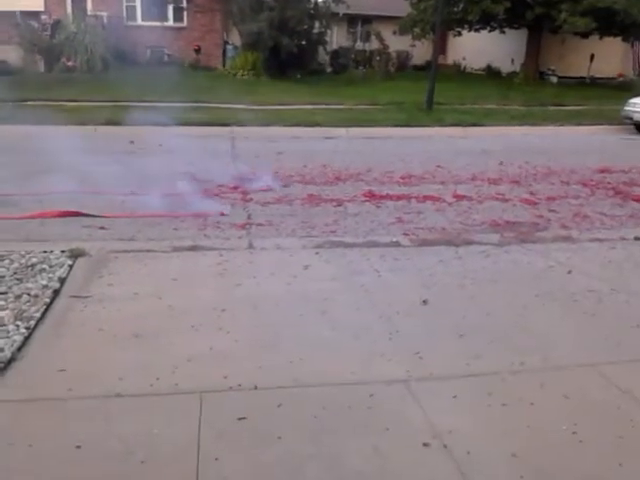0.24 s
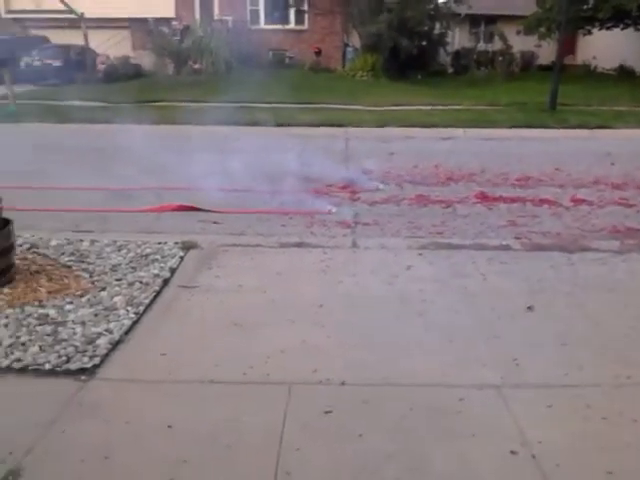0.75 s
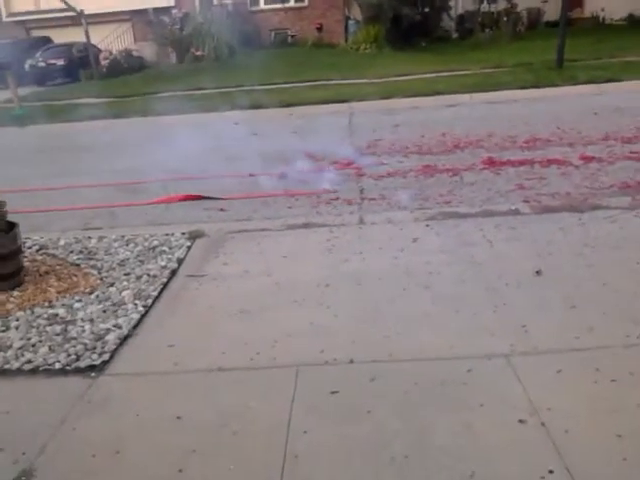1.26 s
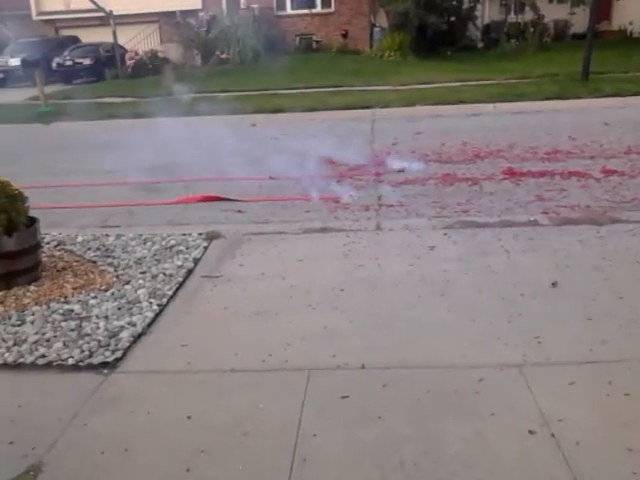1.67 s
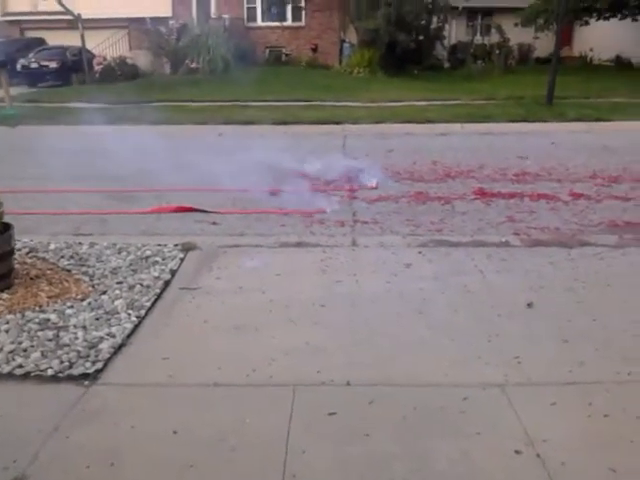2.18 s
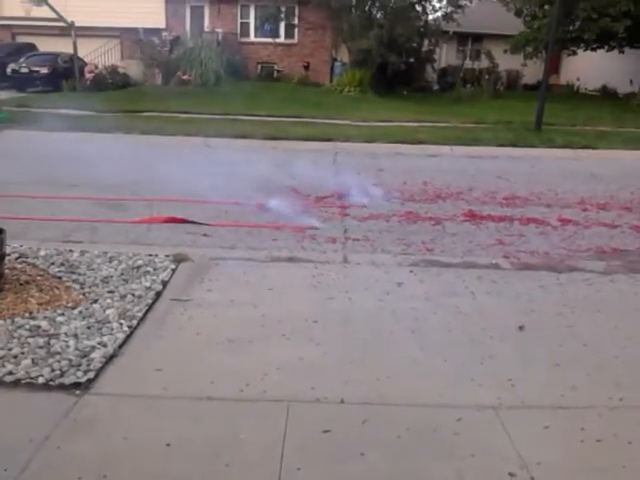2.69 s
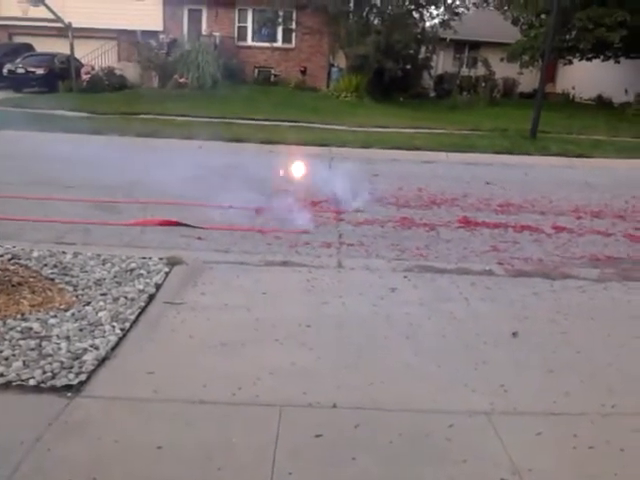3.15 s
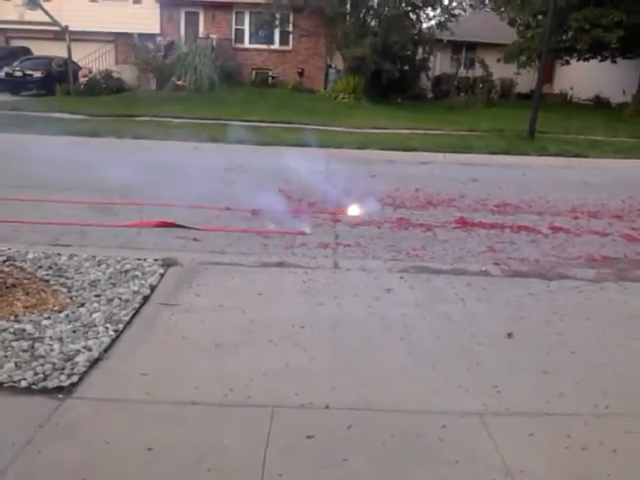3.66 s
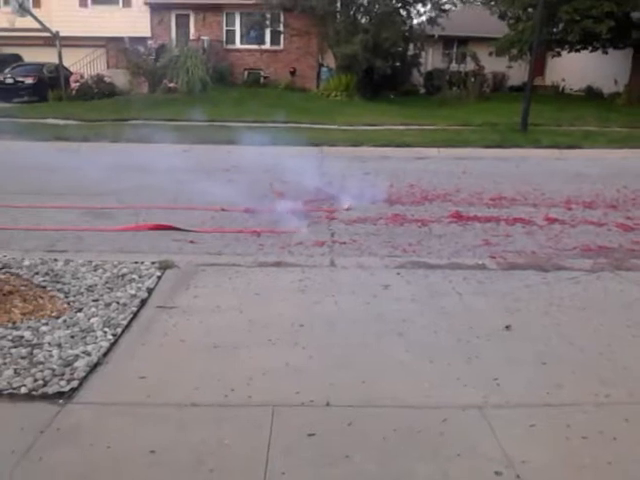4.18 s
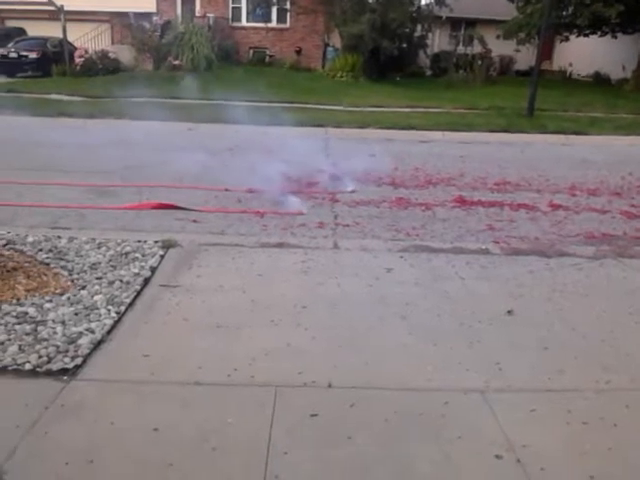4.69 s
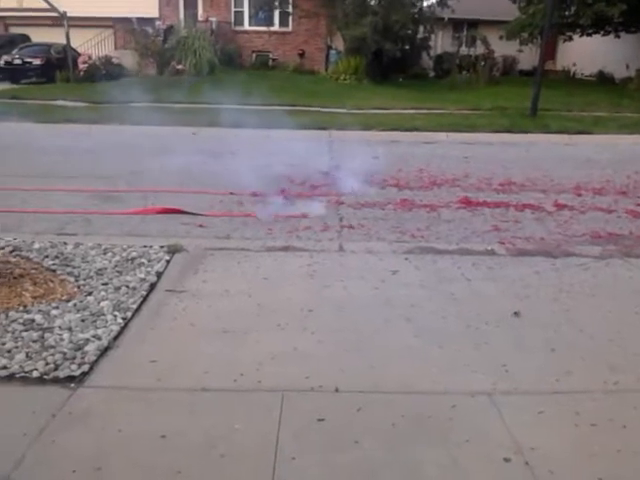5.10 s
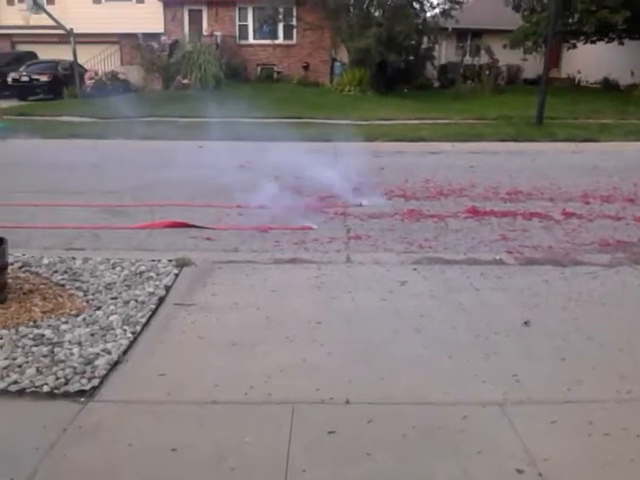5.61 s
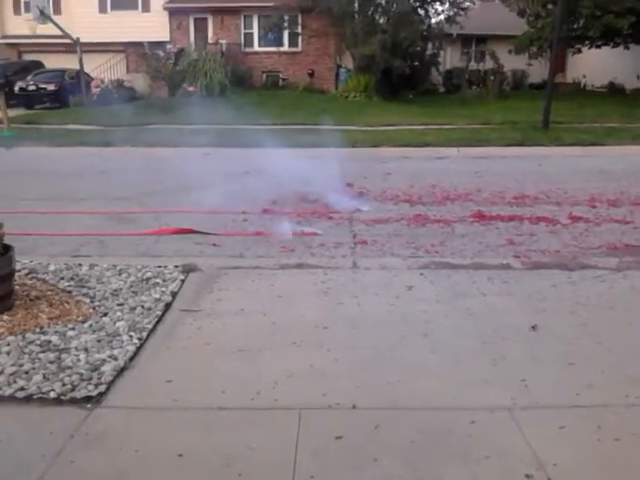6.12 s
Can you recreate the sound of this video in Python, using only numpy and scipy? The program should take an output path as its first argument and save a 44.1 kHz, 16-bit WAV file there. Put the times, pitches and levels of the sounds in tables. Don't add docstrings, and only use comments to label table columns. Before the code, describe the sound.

A dense, ragged barrage of firecrackers crackles without pause outdoors, near bangs harsh and distorted, farther volleys duller, with occasional low thumps.

```python
import sys
import numpy as np
from scipy import signal
from scipy.io import wavfile
from scipy.ndimage import uniform_filter1d, minimum_filter1d

SR = 44100
rng = np.random.default_rng(int(sys.argv[2]) if len(sys.argv) > 2 else 0)


def decibels_to_gain(level_db):
    exponent = np.asarray(level_db, float) / 20
    return 10 ** exponent


def digitize_waveform(pressure):
    field = np.atleast_2d(pressure).T
    bounded = np.clip(field, -1, 1)
    quanta = np.round(bounded * 32767).astype(np.int16)
    wavfile.write(sys.argv[1], SR, quanta)


N = 279946

# t/s, level/dB, thump relative to crack/dB
LONE_POPS = [(0.002, -17, -16.2), (0.19, -11, -4), (0.326, -7, -17), (0.69, -10.0, -8.5), (1.024, -6, -6),
             (1.84, -6.5, -32), (2.042, -9, -17), (2.136, -11.5, -22), (2.45, -13.5, -10),
             (2.468, -12, -21), (2.518, -8, -6), (2.573, -12, -9), (2.672, -19.0, -12), (2.696, -21.5, 0.5),
             (2.838, -19.0, -7), (2.985, -8, -29), (3.061, -13, -30), (3.127, -10.5, -20.5),
             (3.55, -14, -11.1), (3.62, -9.5, -27.5), (4.508, -15.5, -29), (4.572, -13.5, -7.5),
             (4.789, -20, 3), (4.907, -10.5, -21), (4.981, -14, -30), (5.327, -18, -3), (5.388, -11.5, -7),
             (6.046, -10, -11), (6.198, -17.5, -8.5), (6.327, -19, -20.9)]
# t/s, span/s, splatter level/dB
OVERLOADS = [(0.0699, .009, -34), (0.4885, 0, -60), (0.628, .015, -26), (1.0329, 0.0024, -31.5),
             (1.0701, .003, -24.5), (1.8056, 0.0021, -33), (1.836, .02, -24.5), (1.8647, .009, -14),
             (1.8856, 0.0017, -32.5), (2.474, 0.0033, -31.5), (2.523, .009, -20.5), (2.73, 0, -51.5),
             (2.9477, 0, -28), (3.0661, .012, -36.5), (3.1337, 0.0022, -61.5), (3.289, .009, -26),
             (3.315, 0, -58), (3.4361, .007, -21), (3.5854, 0.0018, -30.5), (3.7853, 0, -27.5),
             (3.849, 0.00092, -45.5), (3.881, 0.00034, -35), (3.8934, .009, -35), (3.9873, 0.0025, -45.5),
             (4.2533, 0, -48.5), (4.5783, .002, -30), (5.2176, 0.00088, -24.5), (5.4282, 0, -21.5),
             (5.436, 0.028, -35.5), (5.4537, .019, -18.5)]
# t/s, level/dB, burst length/s, thump relative to crack/dB
VOLLEYS = [(0.239, -4.0, 0.12, -19), (0.457, -2.5, 0.12, -12.5), (0.606, -6.5, 0.12, -10),
           (0.964, -6, 0.11, -7), (1.136, -4.0, 0.13, -8), (1.773, -2, 0.12, -10),
           (1.844, -3, 0.035, -8.5), (1.897, -7.0, 0.12, -23), (2.464, -4.0, 0.07, -13.5),
           (2.705, -5.5, 0.12, -14), (2.902, -2.5, 0.12, -11), (3.268, -5, 0.05, -14),
           (3.383, -6, 0.095, -8.2), (3.478, -7.5, 0.075, -11.5), (3.547, -1.5, 0.1, -11.4),
           (3.733, -3, 0.11, -11), (3.823, -4, 0.11, -19), (3.875, -4.5, 0.082, -6.5),
           (3.947, -7, 0.12, -9), (4.368, -7.5, 0.074, -9), (4.805, -4.5, 0.11, -9),
           (5.002, -1.5, 0.17, -11), (5.123, -2.5, 0.12, -7.5), (5.193, -5.5, 0.12, -9.5),
           (5.395, -3, 0.11, -15), (5.426, -2, 0.031, -3), (5.516, -7.0, 0.089, -9.5),
           (5.607, -8, 0.12, -8.5), (5.954, -7, 0.19, -6), (6.21, -8, 0.084, -6.5),
           (0.052, -9.5, 0.027, -7.5), (0.125, -9.5, 0.11, -7.5), (0.337, -10.5, 0.12, -19),
                  (0.613, -5.5, 0.018, -5.9), (1.055, -13, 0.038, -1.5), (1.056, -12.5, 0.12, -15.5),
                  (1.219, -8, 0.12, -14), (1.572, -9, 0.12, -10), (1.726, -11.5, 0.07, -5.5),
                  (2.018, -8.5, 0.11, -11), (2.063, -8, 0.022, -21.3), (2.263, -11.5, 0.056, -3.5),
                  (2.272, -8.5, 0.029, -24), (2.327, -11, 0.022, -23), (2.356, -11.5, 0.08, -26),
                  (2.546, -12.5, 0.13, -9.5), (2.847, -9, 0.065, -8.5), (3.043, -7.5, 0.095, -4.5),
                  (3.116, -11, 0.07, -8), (3.2, -15, 0.073, -5.5), (3.33, -8, 0.12, -14),
                  (3.426, -4.5, 0.015, -10.5), (3.657, -7, 0.024, -9), (4.085, -10.5, 0.12, -4),
                  (4.221, -7.5, 0.055, -12.1), (4.559, -9, 0.095, -7.5), (4.674, -14.5, 0.16, -7),
                  (5.055, -6, 0.14, -19), (5.84, -12.5, 0.078, -6.5), (6.047, -13.5, 0.15, -8),
           (0.002, -12.5, 0.095, -6), (0.035, -12, 0.14, -20), (0.567, -15, 0.045, -20),
               (0.702, -14, 0.095, -13.5), (0.719, -14.5, 0.035, -25.0), (0.79, -12.5, 0.05, -9.5),
               (0.856, -25, 0.0097, -19.1), (0.908, -19.5, 0.05, -9.5), (1.317, -14.5, 0.05, -24.1),
               (1.488, -17, 0.042, -5.5), (1.539, -19, 0.025, -5.5), (1.641, -14, 0.05, -25.0),
               (1.661, -19.5, 0.07, -7), (2.117, -13.0, 0.15, -23), (2.615, -13.5, 0.011, -29),
               (2.777, -7.5, 0.011, -9.5), (3.01, -14.5, 0.07, -8.5), (3.685, -17, 0.09, -14),
               (4.041, -15, 0.05, -27.5), (4.18, -17, 0.027, -5), (4.278, -16.0, 0.07, -19),
               (4.445, -12, 0.088, -21), (4.912, -19, 0.028, -20.5), (5.347, -13.5, 0.096, -16.5),
               (5.5, -12, 0.077, -30), (5.626, -11, 0.014, -16), (5.699, -14.5, 0.05, -25),
               (5.751, -15.5, 0.095, -19.4), (5.934, -14.5, 0.018, -33), (6.307, -14, 0.1, -14.5)]
# t/s, level/dB
HEAVY_BOOMS = [(0.241, -27), (0.479, -28), (0.618, -24), (0.816, -35), (1.014, -22), (1.15, -29),
               (1.228, -22), (1.782, -15), (2.036, -26.5), (2.262, -22.5), (2.45, -31), (2.719, -22),
               (2.914, -22.5), (3.097, -24.5), (3.365, -23.5), (3.561, -24.5), (3.735, -20.5),
               (4.089, -28.5), (4.202, -31.5), (4.356, -30), (4.569, -27.5), (4.801, -28), (5.009, -31),
               (5.102, -15.5), (5.381, -27.5), (5.599, -24), (5.833, -29.5), (5.959, -35)]
# t/s, level/dB
OPENING_CRACKS = [(0.864, -16), (0.978, -7.5), (1.065, -4.5), (1.149, -7), (1.47, -13), (1.561, -8.5),
                  (1.735, -8.5), (2.285, -7), (2.728, -7.5), (3.211, -4), (3.273, 1), (3.488, -10),
                  (4.669, -13), (4.808, -3), (5.931, -8.5), (6.12, -13), (6.227, -6.5)]
# t/s, upper resonance f/Hz, brightness level/dB
COLOUR_DRIFT = [(0.0, 2260, 4.5), (0.76, 2095, 1), (0.87, 2340, 6), (1.02, 2200, 2), (2.05, 2265, -3.5),
                (2.08, 2370, -4), (2.16, 1840, -10), (2.28, 2450, 4), (2.63, 1990, -2.5), (2.67, 2180, -1),
                (3.91, 2166, 1.5), (4.01, 2410, 0.5), (4.1, 2010, 2), (4.21, 2220, 0.5), (4.97, 2080, 0),
                (5.04, 2210, 1), (6.06, 2336, 3.5), (6.35, 2050, -2.5)]
# f/Hz, level/dB
NARROW_BAND = [(20, -41), (60, -4.5), (150, -4.5), (1000, -2.5), (2400, -2), (3000, -12), (3500, -20.5),
               (3900, -33), (4300, -40.5), (4600, -56.5), (5000, -110), (6000, -120)]

PULSE_GRID_HZ = 8000
FULL_SCALE = .705
RISE_S, SWELL_SHARE = 0.0037, 0.36
POP_S, CRACK_S, CRACK_THUMP_DB = 0.0067, 0.0077, -11
THUMP_CONTRAST = 1.51
LOWER_HZ = 687
RING_DB_PER_DB = -.5
OVER_GAP_S = .0037
OVER_EDGE_DB, OVER_SCATTER_DB = -5.5, -7
BOOM_RISE_S, BOOM_T60, BOOM_FLOOR_DB, BOOM_LEAD_S = 0.0092, 0.24, -51.5, 0.013


def evened(x):
    return x / np.sqrt(np.mean(x ** 2) + 1e-20)


def levelled(x, size):
    power = uniform_filter1d(uniform_filter1d(x ** 2, size), size)
    return x / np.sqrt(abs(power) + 1e-12)


def held(values, seconds):
    return np.interp(np.arange(N) / SR / seconds, np.arange(len(values)), values)


def resonate(x, hz, width_hz):
    turn = np.exp(2j * np.pi * np.cumsum(hz) / SR)
    r = np.exp(-np.pi * width_hz / SR)
    smooth = signal.lfilter([1 - r], [1, -r], x / turn)
    return 2 * (turn * smooth).real


def boost(x, hz, width_hz, db):
    return x + decibels_to_gain(db) * resonate(x, hz, width_hz)


def causal(points):
    f, db = np.transpose(points)
    hz = abs(np.fft.fftfreq(8192, 1 / SR))
    log_gain = np.log(decibels_to_gain(np.interp(np.log(hz + 1), np.log(f + 1), db)))
    min_phase = signal.hilbert(log_gain).imag
    return np.fft.ifft(np.exp(log_gain - 1j * min_phase)).real[:3000]


def pulses(share=.14, spread_db=3.5, dust_db=-10, repeat=0.51):
    count = N * PULSE_GRID_HZ // SR
    k = np.arange(count)
    frame = k // 160
    hit, sign, size, lag = rng.random((count, 4)).T
    crowd = 2.2 * uniform_filter1d(sign[frame * 7], size=80) ** 1.5 + .25
    big = (hit < share * crowd) * np.sign(sign - .5) * decibels_to_gain(-spread_db * np.log(1 - size))
    train = evened(big) + decibels_to_gain(dust_db) * crowd * rng.standard_normal(count)
    back = (18 + 100 * lag[frame] ** 2).astype(int)
    train = train + repeat * train[np.maximum(k - back, 0)]
    out = np.zeros(N)
    out[k * SR // PULSE_GRID_HZ] = train
    return levelled(out, size=260)


def loudness(fall_t60=0.068, sag_t60=0.46, floor_db=-33):
    power = np.ones((2, N + SR)) * decibels_to_gain(2 * (floor_db + np.array([[0], [-12]])))
    t = np.arange(SR // 6) / SR
    volleys = VOLLEYS
    pops = [(s, db, POP_S, low) for s, db, low in LONE_POPS]
    cracks = [(s - RISE_S, db, CRACK_S, CRACK_THUMP_DB) for s, db in OPENING_CRACKS]
    for start, db, length, thump_db in volleys + pops + cracks:
        rise = (1 - np.exp(-t / (RISE_S + SWELL_SHARE * length))) ** 2
        fall_db = 60 * (np.maximum(t - length, 0) / fall_t60 + t / sag_t60)
        at = round(abs(start) * SR)
        power[:, at:at + len(t)] += rise * decibels_to_gain(2 * (db - fall_db + np.array([[0], [thump_db]])))
    return np.sqrt(power[:, :N])


def bangs(taps, jitter_db=-0.7, crack_db=5, ring_db=6.5, mid_db=-2, top_db=-1, thump_db=17, boom_db=3):
    wander = [held(w, .02) for w in rng.standard_normal((N // 400, 7)).T]
    train = pulses() * decibels_to_gain(jitter_db * held(rng.standard_normal(N // 200), .005))
    s, *columns = np.transpose(COLOUR_DRIFT)
    upper_hz, shine_db = (np.interp(np.arange(N) / SR, s, c) for c in columns)
    crack, thump = loudness()
    thump = thump * (thump / np.percentile(thump, 80)) ** (THUMP_CONTRAST - 1)
    boom = decibels_to_gain(boom_db) * booms() * thump / uniform_filter1d(thump, size=4000)
    swing = .095
    bright_db = 20 * np.log10(crack / crack.mean())

    high_pass = signal.butter(1, 800, "high", fs=SR)
    out = signal.lfilter(*high_pass, train * crack) * decibels_to_gain(crack_db)
    lower_hz = LOWER_HZ * np.exp(0.25 * wander[6])
    out = out + resonate(train * thump, lower_hz, 250) * decibels_to_gain(thump_db)
    upper_db = ring_db + RING_DB_PER_DB * bright_db + 2.9 * wander[1]
    out = boost(out, upper_hz * (1 + swing * wander[0]), 330, upper_db)
    out = boost(out, 1350 * (1 + 2 * swing * wander[2]), 170, mid_db + 1.2 * wander[3])
    shine_db = top_db + shine_db + 4.3 * wander[5] + 0.1 * bright_db
    out = boost(out, 3150 * (1 + swing / 2 * wander[4]), 410, shine_db)
    out = boost(out, np.full(N, 3900.), 520, 3 * wander[4] + 1.1 * bright_db)

    boom_hz = np.full(N, 95.)
    low_ring = resonate(resonate(train, boom_hz, 210), boom_hz, 210)
    out -= boom * levelled(low_ring, size=1200)
    return signal.oaconvolve(out, taps)[:N]


def flurries():
    chance = rng.random((len(OVERLOADS), 2, 9))
    out = []
    for (start, span, db), (shift, size) in zip(OVERLOADS, chance):
        count = 1 + int(np.ceil(span / OVER_GAP_S))
        place = np.linspace(-1, 1, count) * (count > 2)
        uneven_s = (count > 2) * (shift[:count] - .5) * OVER_GAP_S / 2
        s = start + np.linspace(0, span, count) + uneven_s
        scatter_db = (count > 1) * OVER_SCATTER_DB * size[:count]
        out += zip(s, db + OVER_EDGE_DB * place ** 2 + scatter_db)
    return np.transpose(out)


def overs(taps, reach_db=9):
    shape = resonate(taps[:400], np.full(400, 1900.), 1300)
    peak = np.argmax(abs(shape))
    shape = shape / shape[peak]
    s, db = flurries()
    top = np.argmax(shape)
    at = np.maximum(np.round(s * SR).astype(int) - top, 0)
    train = np.zeros(N)
    train[at] = (FULL_SCALE + decibels_to_gain(db + reach_db)) * np.sign(rng.random(len(s)) - .5)
    lead = 55 - top
    cover = signal.oaconvolve(train != 0, 1.4 * np.hanning(130))[lead:N + lead]
    hush = 1 - np.minimum(cover, 1)
    return signal.oaconvolve(train, shape)[:N], hush


def booms():
    power = np.full(N + SR, decibels_to_gain(2 * BOOM_FLOOR_DB))
    t = np.arange(SR // 4) / SR
    for start, db in HEAVY_BOOMS:
        at = round((start - BOOM_LEAD_S) * SR)
        rise = (1 - np.exp(-t / BOOM_RISE_S)) ** 2
        power[at:at + len(t)] += rise * decibels_to_gain(2 * (db - 60 * t / BOOM_T60))
    return np.sqrt(power[:N])


def scene():
    taps = causal(NARROW_BAND)
    band_edge = signal.firwin(201, 4600, window=("kaiser", 11), fs=SR)
    spikes, hush = overs(taps)
    room = np.maximum(.62 - abs(spikes), .03)
    rumble_cut = signal.butter(2, 33, "high", fs=SR)
    loud = signal.lfilter(*rumble_cut, bangs(taps)) * hush
    dip = minimum_filter1d(room / np.maximum(abs(loud), room), size=61)
    dip = uniform_filter1d(uniform_filter1d(dip, size=31), size=31)
    return (signal.oaconvolve(loud * dip, band_edge, "same") + spikes)[None]


def low_pass(x):
    return signal.sosfilt(signal.butter(12, 15900, fs=SR, output="sos"), x)


def record(dry):
    clipped = np.clip(dry, -FULL_SCALE, FULL_SCALE)
    return low_pass(clipped)


dry = scene()
out = record(dry)
digitize_waveform(out)
```